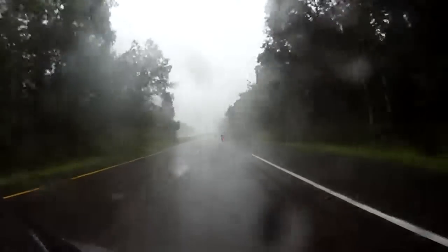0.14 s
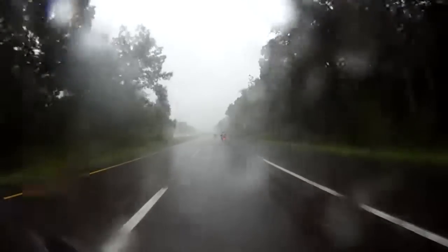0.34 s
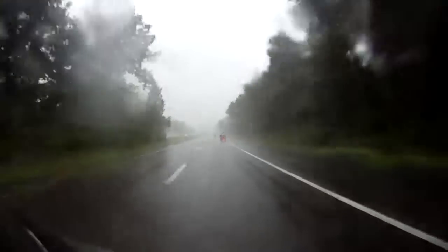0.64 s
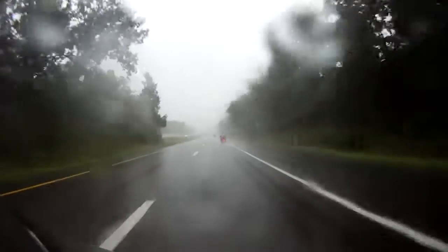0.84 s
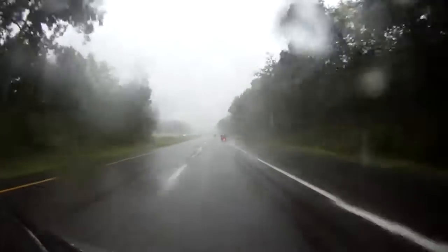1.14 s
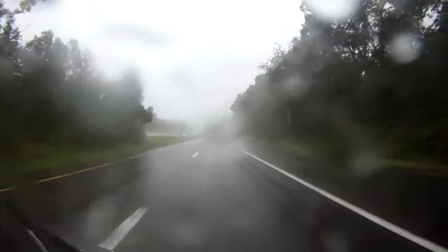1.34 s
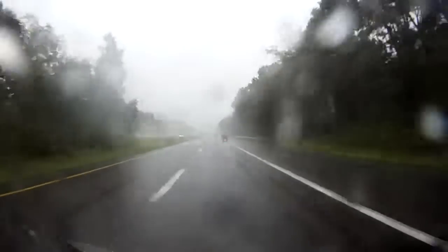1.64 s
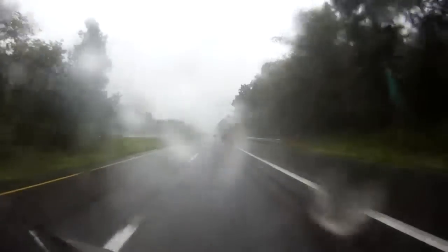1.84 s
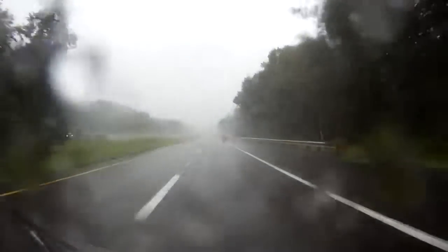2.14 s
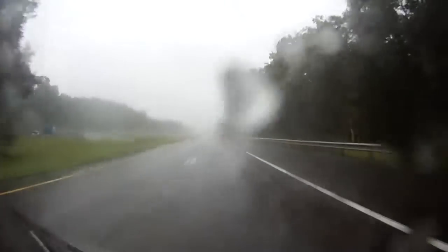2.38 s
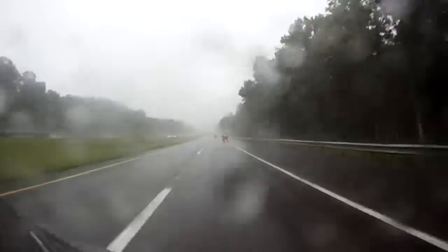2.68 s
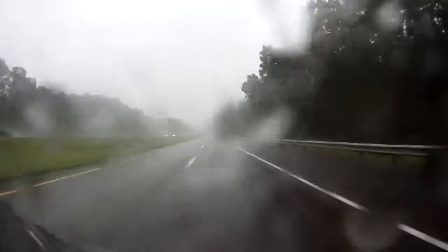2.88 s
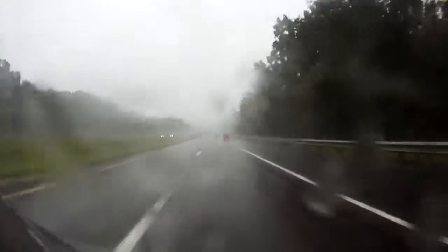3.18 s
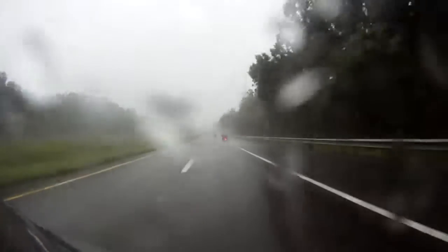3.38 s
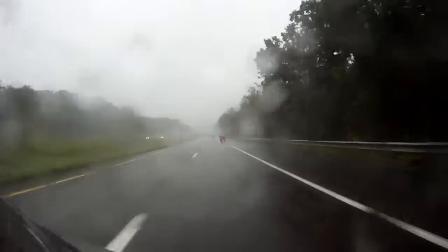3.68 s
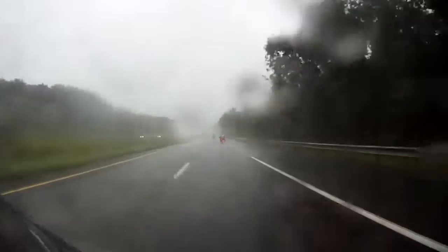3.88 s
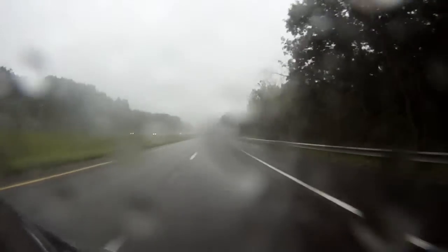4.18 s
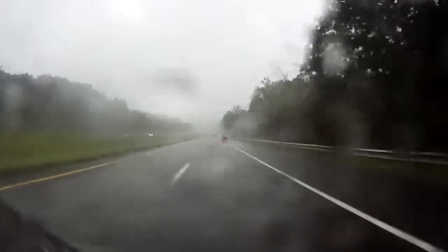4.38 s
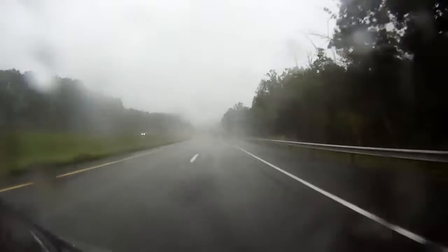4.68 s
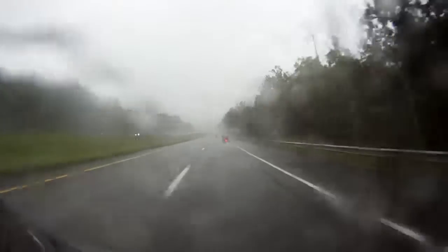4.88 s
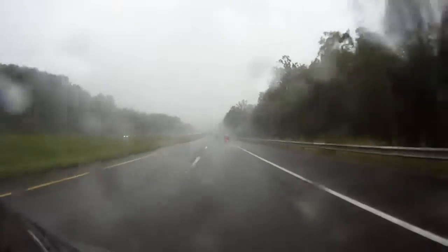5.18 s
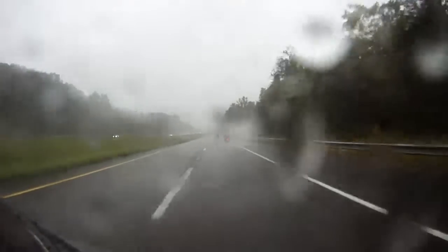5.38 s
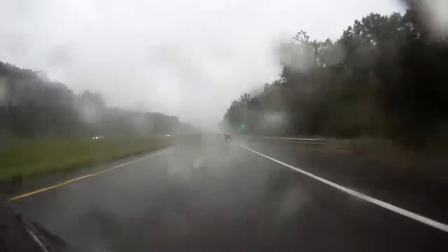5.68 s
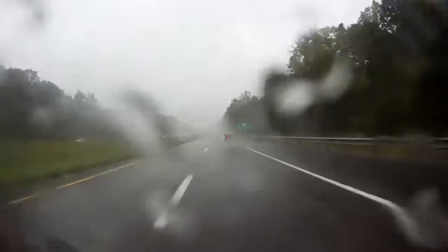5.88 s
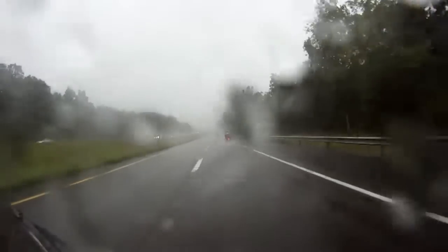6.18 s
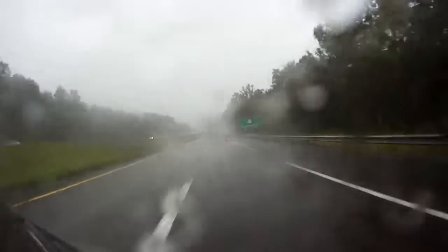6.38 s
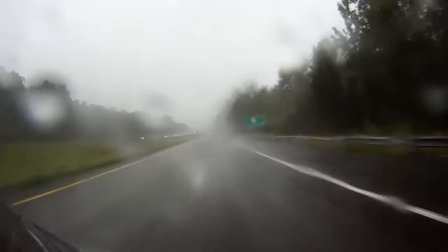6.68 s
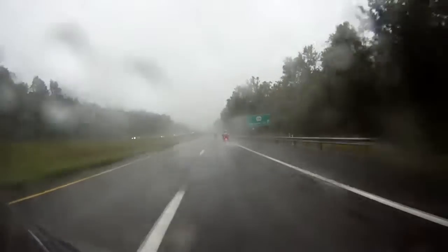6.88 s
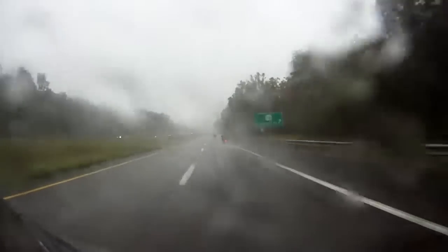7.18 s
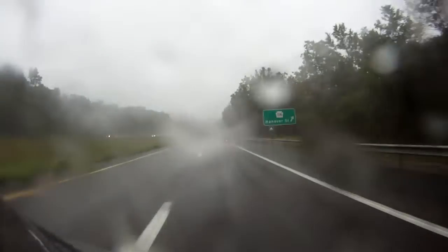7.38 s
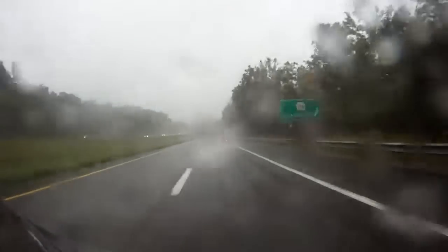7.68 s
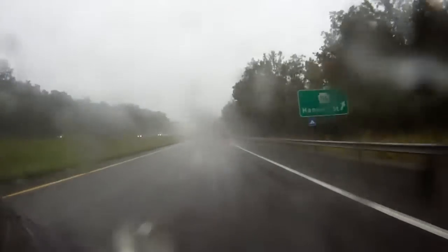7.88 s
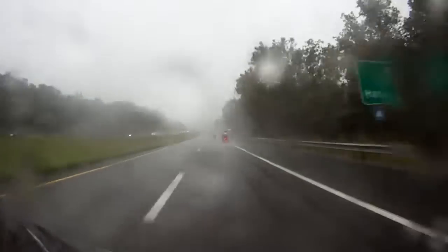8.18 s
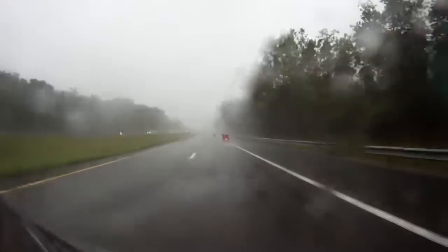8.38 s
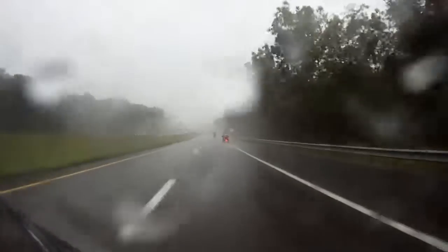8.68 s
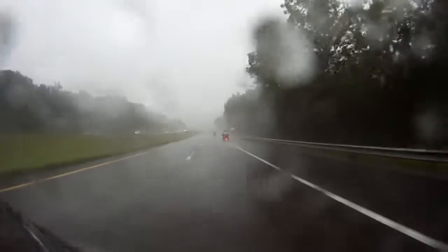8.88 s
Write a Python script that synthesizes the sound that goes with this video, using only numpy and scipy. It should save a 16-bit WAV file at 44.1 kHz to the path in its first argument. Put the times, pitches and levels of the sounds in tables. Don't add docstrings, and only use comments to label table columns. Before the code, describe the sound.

From inside a sealed plastic camera housing on a motorcycle cruising a wet highway, raindrops hit constantly and irregularly, each a short hard snap with a tiny hollow ring. Fine patter and narrow spray hiss fill the gaps. Low wind rumble swells in gusts, with a wavering engine drone underneath. Heavy drops clip harshly and briefly push everything else down. Close, dry, mono and gritty.

```python
import sys
import numpy as np
from scipy import signal
from scipy.io import wavfile
from scipy.ndimage import uniform_filter1d

SR = 44100
rng = np.random.default_rng(int(sys.argv[2]) if len(sys.argv) > 2 else 0)


def store_pcm(level_fs):
    pcm = np.round(np.clip(level_fs, -1, 1) * 32767).astype(np.int16)
    wavfile.write(sys.argv[1], SR, np.atleast_2d(pcm).T)


def convert_level_to_amplitude(level_db):
    exponent = np.asarray(level_db, float) / 20
    return 10 ** exponent


N = 398656

HEADROOM_DB, RECOVER_S = 8.5, 0.11


def evened(x):
    return x / np.sqrt(np.mean(x ** 2) + 1e-20)


def add(mix, at, sound):
    part = mix[at:][:len(sound)]
    part += sound[:len(part)]


def complex_noise():
    return rng.standard_normal(N) + 1j * rng.standard_normal(N)


def strike(ring_hz, bright_db, chance, rise_s=0.00061, spread_db=3.5, damping=1.187):
    # pitch in Hz, level in dB, time to fade by 60 dB in seconds.
    shell_modes = [(1224, -19.5, 0.02), (2922, -6, 0.014), (3353, -8.5, 0.014), (3664, -5.5, 0.014),
                   (4612, -6, 0.0069), (5065, -8, 0.0074)]
    ring_t60, crack_t60, crack_db = 0.0096, 0.0045, -1.5
    t = np.arange(1024) / SR
    out = convert_level_to_amplitude(-60 * t / ring_t60) * np.sin(2 * np.pi * ring_hz * t)
    for (hz, db, t60), (u, v) in zip(shell_modes, chance.reshape(-1, 2)):
        level = convert_level_to_amplitude(bright_db + db + spread_db * u - 60 * damping * t / t60)
        out = out + level * np.sin(2 * np.pi * hz * (1 + 0.025 * v) * t)
    splash = evened(uniform_filter1d(chance, size=3) - uniform_filter1d(chance, size=48))
    out = out + convert_level_to_amplitude(crack_db + bright_db / 2 - 60 * t / crack_t60) * splash
    out = out * (1 - np.exp(-t / rise_s))
    return out / abs(out).max()


def drops():
    # start in seconds, force in dB.
    rim = [(0.4112, 7.5), (0.4927, 10.5), (0.518, 8.0), (0.75, 4), (0.8785, 8.5), (0.8847, 1), (0.9934, 10),
           (1.06, 11), (1.1764, 7.5), (1.4364, -0.5), (2.1094, -1), (2.2898, 4.5), (2.4388, 0.5),
           (2.7136, 8), (2.8298, 6), (2.992, 5), (3.3158, 9.5), (3.5784, -3.5), (3.7916, 5.0),
           (4.3354, 3.0), (4.4339, -1), (4.4905, 4.0), (5.3041, 4.5), (5.7383, 2), (6.0305, 8.5),
           (6.433, 3), (7.5168, -0.5), (7.9602, 6), (8.135, -3.5), (8.2806, -2)]
    face = [(0.179, 7), (0.3067, 10.5), (0.5543, 17), (1.1366, 7), (1.508, 5), (1.5725, 8.0), (2.1901, 6.5),
            (2.306, 9), (2.388, 7.5), (2.5765, 15.5), (3.251, 1), (3.6137, 15.5), (4.1046, 12), (4.2234, 1),
            (4.229, 2), (4.545, 13), (4.6486, 6.5), (4.69, 2.5), (5.1845, 4.5), (5.2484, 5), (5.6364, 8.5),
            (5.975, 7), (6.509, 10), (6.9482, 0), (7.284, 13.5), (7.382, 7), (8.173, -2), (8.266, 5.5),
            (8.3575, 10), (8.6929, 23)]
    face_glancing = [(0.0335, 9.5), (0.1572, 2), (1.1141, 9), (1.4916, 7.5), (1.5967, 7.0), (2.8646, 6),
                     (2.9803, 6), (3.4762, 1.5), (4.7184, 7.5), (4.909, 2), (5.0144, 7), (5.5848, 7.5),
                     (5.874, 14.5), (6.117, 6), (6.418, -16), (6.6978, 7), (6.782, 8.5), (6.9138, -0.5),
                     (7.0313, 5.5), (7.078, -2.5), (7.422, 9.5), (7.4565, 9.5), (7.5715, 10), (7.794, 12.5),
                     (7.8124, 9.0), (7.9083, 5), (7.97, 8.5), (8.189, 4), (8.5985, 9.5), (8.944, 13)]
    lid = [(0.4151, 7), (0.447, 4.5), (0.7205, 10), (0.7731, 10.5), (0.9516, 9.5), (1.1603, 13.5),
           (1.2804, 15.0), (1.363, 6.0), (1.7359, 9.0), (1.8781, 10), (1.8978, 18.5), (2.1966, 2),
           (2.3307, 3.5), (2.5323, 5), (3.5744, -3.5), (3.7562, 1), (4.011, 17), (4.727, 11), (4.951, 16.5),
           (4.987, 14.0), (5.275, -2.5), (5.8103, 18), (6.2187, 6), (6.5454, 21.0), (7.19, 18),
           (7.613, 12.5), (8.317, 1.5), (8.4322, 7), (8.5375, 19.5), (8.8471, 15.5)]
    lid_glancing = [(0.1457, 6.0), (0.1936, 9), (0.7857, 12.5), (0.9145, 9.5), (1.225, 6.5), (1.9409, 13),
                    (2.0147, 9.5), (2.0921, 8), (2.2487, 6.0), (2.7419, 11.5), (2.7758, 11.0), (3.1302, 8),
                    (3.2395, -6), (3.6005, -3), (3.8076, -2), (3.8196, 13.5), (4.2028, 4), (4.3449, 10.5),
                    (4.8877, 7.5), (6.2558, 3), (6.305, -1.5), (6.6802, 9), (7.6712, 3.5), (7.7347, 5.5),
                    (7.7898, 3.5), (7.9838, 9.5), (8.1927, 7), (8.6772, 4.5), (8.9561, 13), (9.004, 17)]
    window = [(0.3144, 10), (1.0942, 2.0), (1.8568, 1.0), (2.2058, 9), (2.681, 8), (2.8363, 11.5),
              (3.068, 7.5), (3.0904, 16), (3.4062, 11), (4.7695, 8), (4.8337, 8), (5.282, 10),
              (5.3382, 12.5), (5.553, 13.5), (5.6959, 9), (5.9326, 11.0), (6.1313, 7), (6.1418, 7.5),
              (6.4281, 7.5), (6.4652, 4.5), (6.614, 18.5), (6.7646, 8), (7.115, 14), (7.3713, 5),
              (7.7531, 14), (8.204, 10.5), (8.5192, 14.0), (8.688, 3), (8.8338, 4.5), (8.976, 14)]
    window_glancing = [(0.0724, 5), (0.142, -2), (0.1761, 0.0), (0.3815, 7), (0.5277, 5), (2.2648, 6.5),
                       (2.6472, 5.5), (2.8091, 8.5), (2.8201, 9.5), (2.935, 8), (3.2233, 6.5), (3.277, 9.5),
                       (4.5074, 11), (4.815, 4), (4.892, 6), (5.02, 9), (5.487, -1.5), (6.0947, 6),
                       (6.3707, -2), (6.495, 5), (6.7953, 1), (6.8259, 8.5), (6.964, 6), (7.0238, 4),
                       (7.1626, 12.5), (7.5635, 2.5), (7.701, 5.5), (8.0186, 7.5), (8.0664, 4.0),
                       (8.2996, 2.5)]
    flank = [(.1002, -10), (.1361, -4), (.2252, -1), (.2333, 0.5), (.3198, 4), (.7349, 1), (.9426, -6),
             (1.9153, 4), (2.1375, -1), (2.274, -2), (2.4505, -6), (2.4994, -7), (2.9199, 2), (3.009, -6),
             (3.3646, -2), (3.666, 3.5), (4.0274, 12), (4.062, 7), (4.1677, -0.5), (4.316, -11),
             (4.7778, 1.5), (4.8788, -2), (4.9462, -5), (5.1684, -4), (6.595, 7), (6.703, 3.5), (6.7266, 1),
             (7.656, 5), (8.223, 3), (8.8998, 6)]
    corners = [(0.1007, -5), (0.6973, 0.5), (1.3232, 5), (1.9513, 6), (2.1165, -2), (2.3377, 0),
               (2.4998, -4.5), (2.6683, 0.5), (3.0108, -1), (3.0436, -7), (3.516, -6), (3.5436, -5),
               (3.9314, -2.5), (3.974, -4.5), (4.143, 2), (4.3586, 3), (4.6127, 0.5), (4.8807, -2),
               (6.1771, -4), (6.2325, -5), (6.2463, -3), (6.279, -1.5), (6.3502, -6.5), (6.3812, -8),
               (6.394, -2), (6.7433, -1), (6.8414, 0.5), (6.8994, 0), (7.4892, 1.5), (8.3993, 0)]
    # pitch of the shell's ring in Hz, brightness in dB.
    spots = [
        (2730, 10.5),
        (2133, -4),
        (1996, 4),
        (2209, -5.5),
        (2306, 0),
        (2340, -3.5),
        (2440, 2),
        (2210, 0.5),
        (2780, 4.5),
    ]
    dulling = 0.33
    tables = [rim, face, face_glancing, lid, lid_glancing, window, window_glancing, flank, corners]
    found = []
    for rows, (ring_hz, bright_db) in zip(tables, spots):
        for s, force_db in rows:
            found.append((s, force_db, ring_hz, bright_db - dulling * force_db))
    return sorted(found)


def large_drops():
    stiff_db, stiff_share = 15.5, 0.44
    rows = drops()
    out, chances = np.zeros(N), rng.standard_normal((len(rows), 1024))
    for (s, force_db, ring_hz, bright_db), chance in zip(rows, chances):
        level_db = force_db - stiff_share * max(force_db - stiff_db, 0)
        add(out, round(s * SR), convert_level_to_amplitude(level_db) * strike(ring_hz, bright_db, chance))
    return out


def thuds():
    # start in seconds, peak level in dB.
    shoves = [(0.552, -15), (1.056, -13), (1.874, -8), (2.575, -5), (3.402, -16), (3.817, -4), (4.007, -4),
              (5.279, -13), (5.549, -6.5), (5.807, -15), (6.961, -12), (7.11, -10), (8.354, -16),
              (8.516, -27), (8.688, -21), (8.941, -19)]
    thud_hz, thud_t60, gain_db = 412, 0.01, -1.5
    t, out = np.arange(1024) / SR, np.zeros(N)
    pitch_factors = rng.uniform(0.6, 1.85, len(shoves))
    for (s, peak_db), factor in zip(shoves, pitch_factors):
        level = convert_level_to_amplitude(peak_db + gain_db - 60 * t / thud_t60)
        add(out, round(s * SR), level * np.sin(2 * np.pi * thud_hz * factor * t))
    return out


def patter(count=24):
    patter_db, per_second = -22.5, 450
    lands = rng.random(N) < per_second / SR
    size = convert_level_to_amplitude(8.1 * np.minimum(rng.exponential(1, N), 2.3)) * lands
    spot, chances = rng.integers(0, count, N), rng.standard_normal((count, 1024))
    out = np.zeros(N)
    for k, chance in enumerate(chances):
        ring_hz, bright_db = 2140 + 45 * chance[-1], 0.65 + 5 * chance[-2]
        tap = strike(ring_hz, bright_db, chance, rise_s=0.0003, damping=1.4)
        out += signal.oaconvolve(size * (spot == k), tap)[:N]
    return convert_level_to_amplitude(patter_db) * evened(out)


def read(points, hz):
    f, value = np.transpose(points)
    return np.interp(np.log(hz + 1), np.log(f + 1), value)


def noise(shape, patchy_db, flicker_db, size):
    frames, hz = 4 * N // size + 5, np.fft.rfftfreq(size, 1 / SR)
    a, b, patches = rng.standard_normal((frames, len(hz), 3)).T
    patches = uniform_filter1d(patches, size=6, axis=0)
    patches = evened(uniform_filter1d(patches, size=8, axis=1))
    flicker = evened(uniform_filter1d(rng.standard_normal(frames), size=3))
    shape_db = read(shape, hz) - 25 * (hz < 14)
    z = (a + 1j * b) * convert_level_to_amplitude(shape_db[:, None] + patchy_db * patches + flicker_db * flicker)
    return evened(signal.istft(z, nperseg=size, noverlap=3 * size // 4)[1][:N])


def spray():
    # frequency in Hz, level in dB per Hz.
    hiss_shape = [(400, -11.5), (760, -7), (950, -6.5), (1160, -4), (1330, -4.5), (1960, -3.5), (2120, 5),
                  (2330, 3.5), (3150, -11), (3720, -27), (4190, -35), (5200, -10), (5900, -63)]
    return convert_level_to_amplitude(-23) * noise(hiss_shape, patchy_db=0.76, flicker_db=3.5, size=512)


def cavity():
    cavity_hz, width_hz, cavity_db = 2112, 71, -28
    r = np.exp(-np.pi * width_hz / SR)
    slow = signal.lfilter([1], [1, -r], complex_noise())
    tone = np.exp(2j * np.pi * cavity_hz * np.arange(N) / SR)
    return convert_level_to_amplitude(cavity_db) * evened((slow * tone).real)


def gusts(share=0.53):
    # time in seconds, buffet level in dB.
    gust_points = [(0.0, -3), (0.26, -27), (1.03, -15), (1.4, -24), (2.3, -20.5), (2.6, -23.5), (2.84, -26),
                   (3.15, -16), (3.9, -27.5), (4.4, -19), (4.7, -27.5), (5.4, -25.5), (5.7, -22.5),
                   (6.7, -20.5), (7.7, -22), (8.0, -22.5), (8.5, -18.5), (9.04, -26)]
    s, db = np.transpose(gust_points)
    return convert_level_to_amplitude(share * np.interp(np.arange(N) / SR, s, db - db.mean()))


def wind():
    # frequency in Hz, level in dB per Hz.
    rumble_shape = [(20, 0.5), (36, 2.5), (62, -7), (110, -6.5), (165, -15.5), (260, -34.5)]
    return convert_level_to_amplitude(-18) * noise(rumble_shape, patchy_db=3.0, flicker_db=3.0, size=4096)


def engine():
    # multiple of the half crank speed, level in dB, blur of the tone in Hz.
    shake_orders = [(2, -25.5, 9.5), (5, -23.5, 15), (6, -33.5, 12.4), (7, -30.5, 6.6), (9, -42.5, 15)]
    cycle_hz = 18.4
    t, out = np.arange(N) / SR, np.zeros(N)
    for multiple, db, blur_hz in shake_orders:
        r = np.exp(-np.pi * blur_hz / SR)
        wander = signal.lfilter([1], np.poly([r, r]), complex_noise())
        wander = wander / np.sqrt(np.mean(abs(wander) ** 2))
        tone = np.exp(2j * np.pi * multiple * cycle_hz * t)
        out += convert_level_to_amplitude(db) * evened((wander * tone).real)
    return out


def scene():
    rain = large_drops() + patter() + spray() + thuds() + cavity()
    through_mount = gusts() * (wind() + engine())
    return (rain + through_mount)[None]


def dips():
    knee_db, slope = 2.5, 1.3
    after, last_s, dip_db = [], 0, HEADROOM_DB
    for s, force_db, _, _ in drops():
        relaxed_db = dip_db * np.exp(-(s - last_s) / RECOVER_S)
        dip_db = max(relaxed_db, slope * (force_db - knee_db))
        after.append(dip_db)
        last_s = s
    return np.array(after)


def ducked(x):
    lag_s, attack_s = 0.0066, 0.0008
    t, starts = np.arange(N) / SR, np.array([0] + [row[0] + lag_s for row in drops()])
    last = np.searchsorted(starts, t, "right") - 1
    dip_db = np.r_[HEADROOM_DB, dips()][last] * np.exp(-(t - starts[last]) / RECOVER_S)
    r = np.exp(-1 / (attack_s * SR))
    dip_db = signal.lfilter([1 - r], [1, -r], dip_db - HEADROOM_DB) + HEADROOM_DB
    return x / convert_level_to_amplitude(dip_db)


def gate(x):
    z = signal.stft(x, nperseg=1024)[2]
    faint = uniform_filter1d(abs(z) ** 2, size=9, axis=1) < convert_level_to_amplitude(2 * -80)
    return signal.istft(z * np.where(faint, .1, 1), nperseg=1024)[1][:, :N]


def roll_off(x):
    return signal.sosfilt(signal.butter(12, 16000, fs=SR, output="sos"), x)


def record(dry):
    guarded = signal.oaconvolve(dry, signal.firwin(61, 6100, fs=SR)[None], "same")
    inner = signal.resample_poly(ducked(guarded), 40, 147, axis=1)
    inner = np.clip(inner, -1, 1)
    held = signal.resample_poly(np.repeat(inner, 4, axis=1), 147, 160, axis=1)[:, :N]
    held = np.pad(held, ((0, 0), (0, N - held.shape[1])))
    band_limit = signal.firwin(75, 15120, window=("kaiser", 3), fs=SR)[None]
    dull = signal.oaconvolve(np.clip(held, -.97, .97), band_limit, "same")
    finished = gate(dull)
    return roll_off(finished)


dry = scene()
out = record(dry)
store_pcm(out)
```